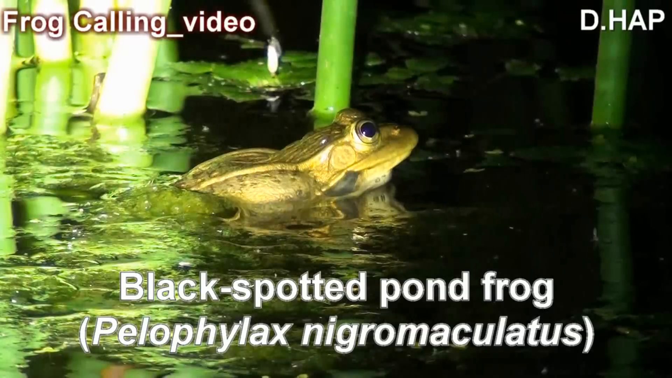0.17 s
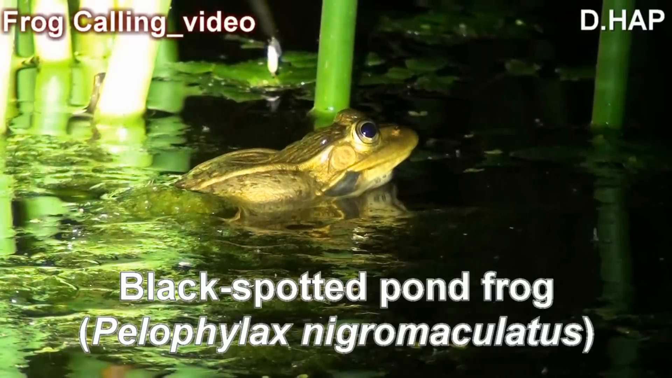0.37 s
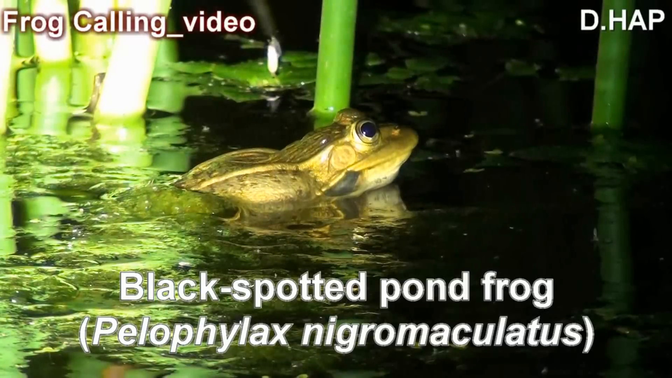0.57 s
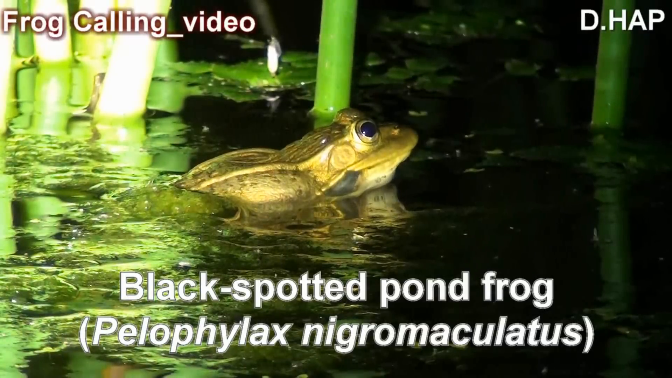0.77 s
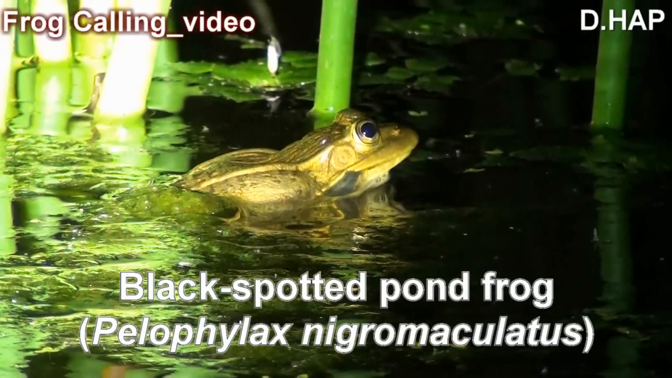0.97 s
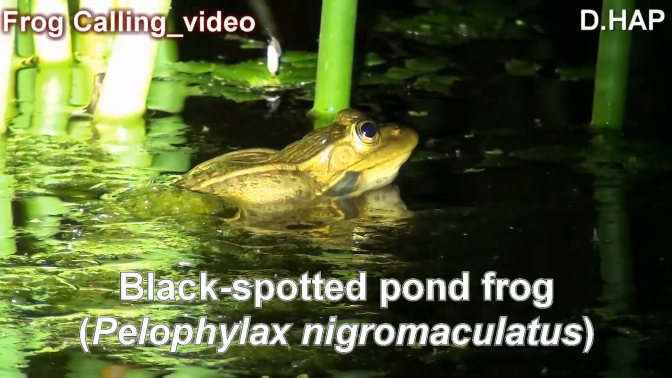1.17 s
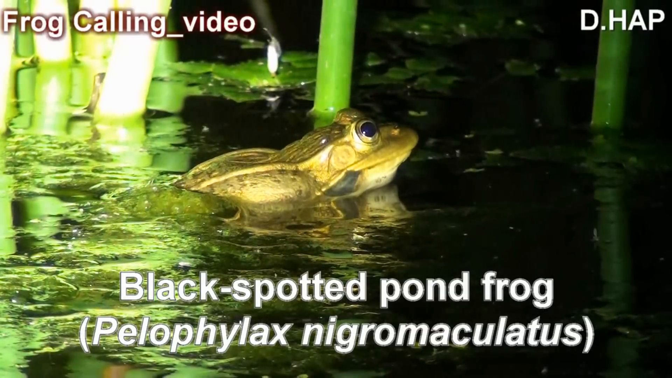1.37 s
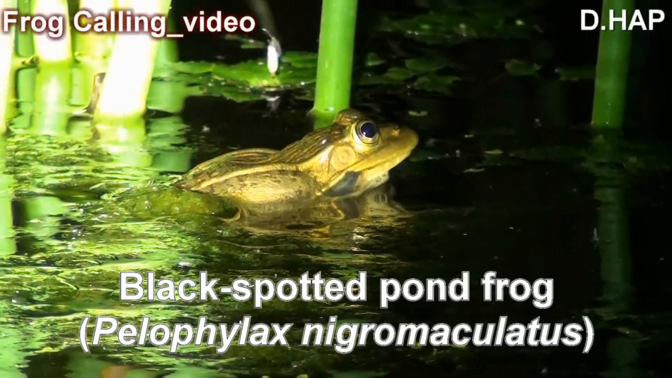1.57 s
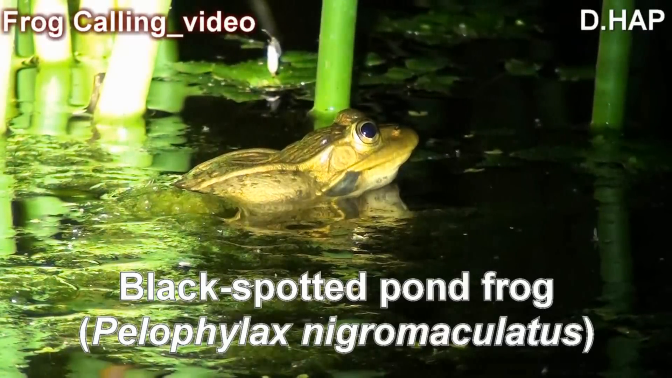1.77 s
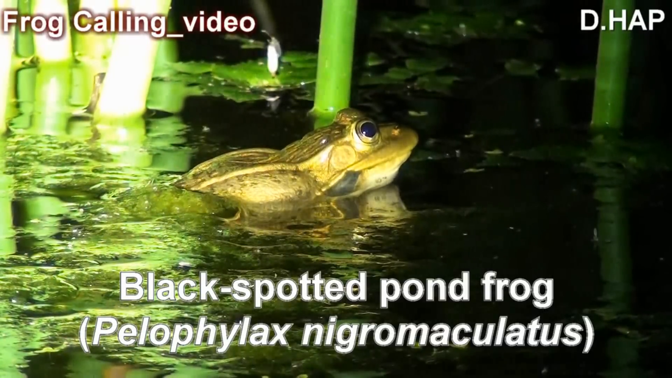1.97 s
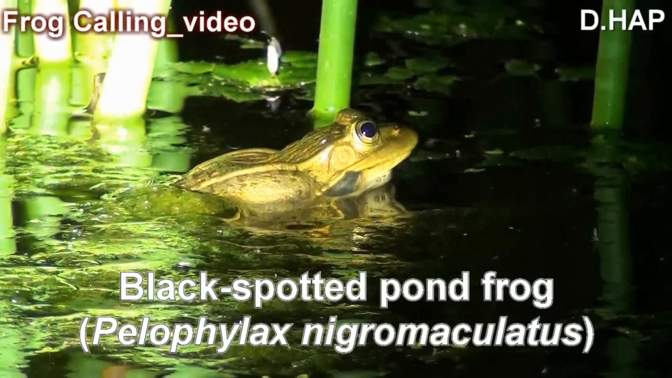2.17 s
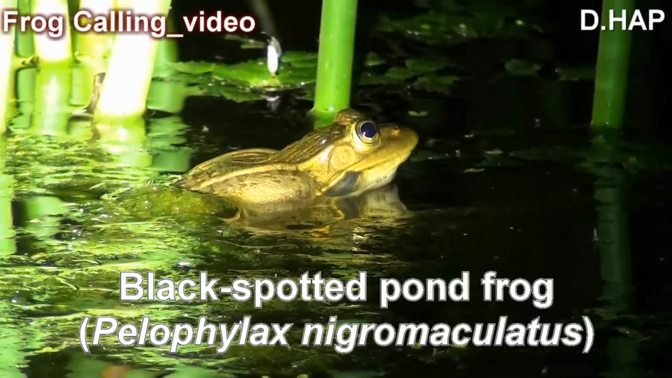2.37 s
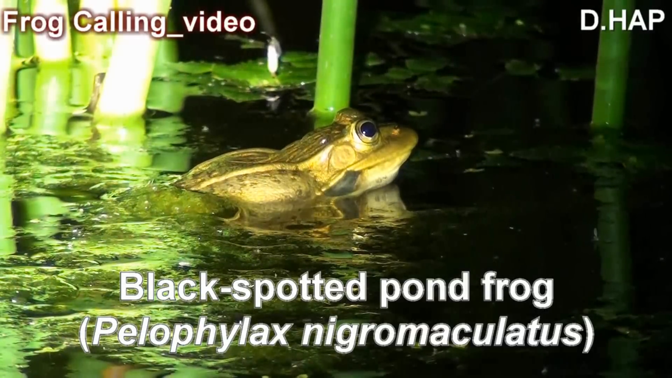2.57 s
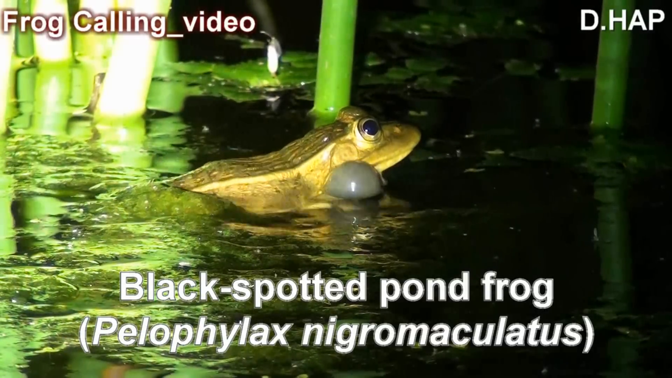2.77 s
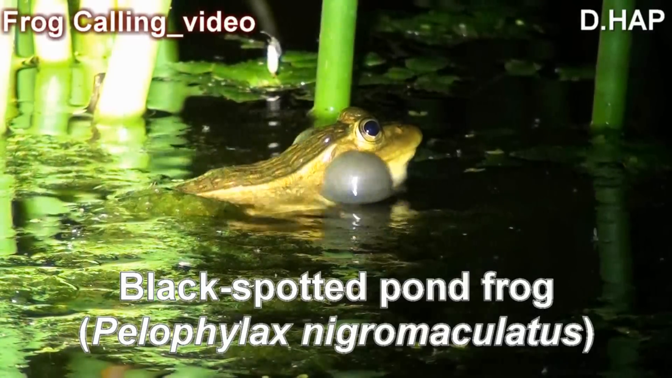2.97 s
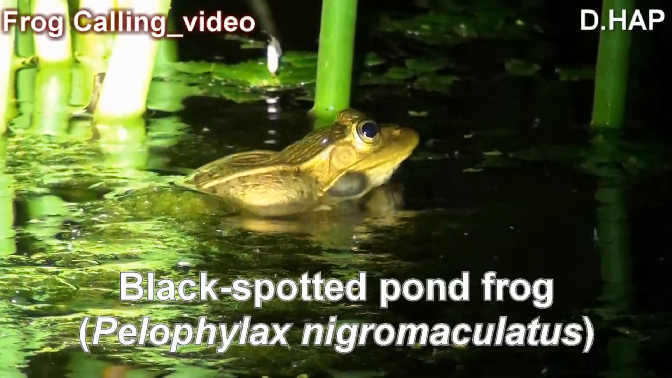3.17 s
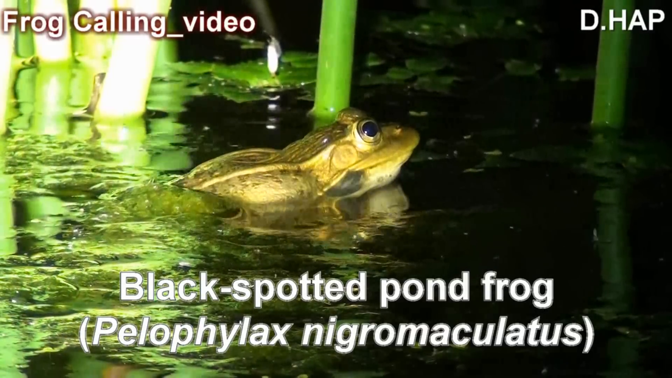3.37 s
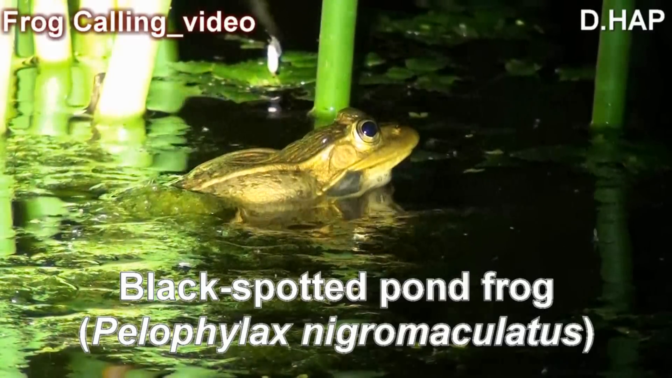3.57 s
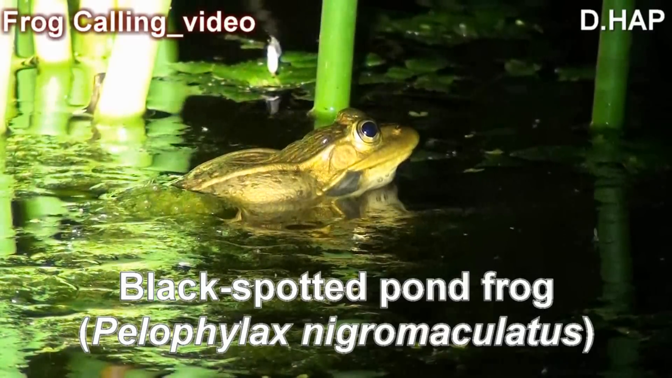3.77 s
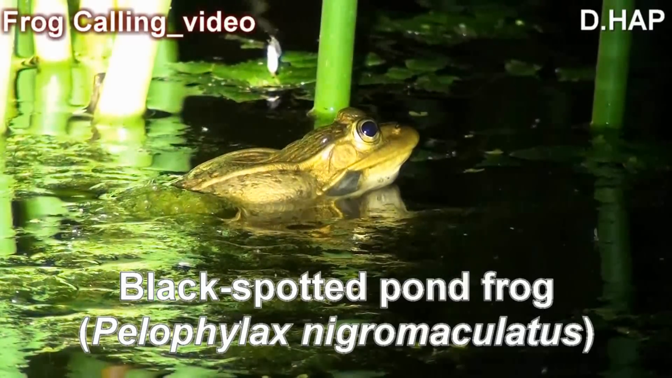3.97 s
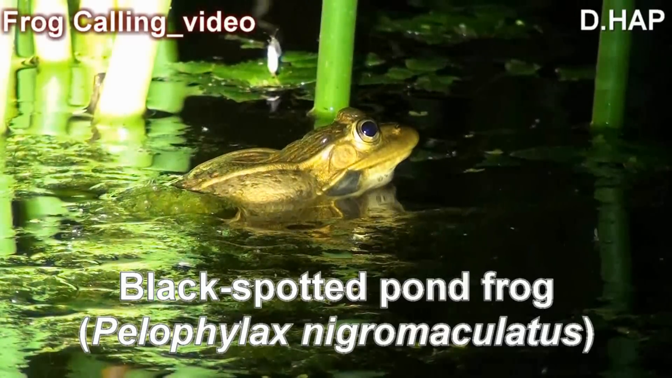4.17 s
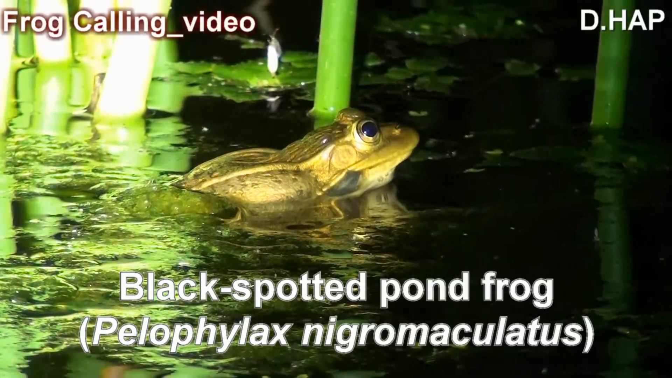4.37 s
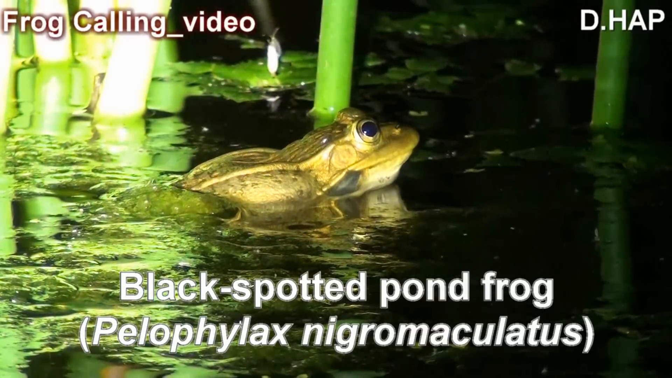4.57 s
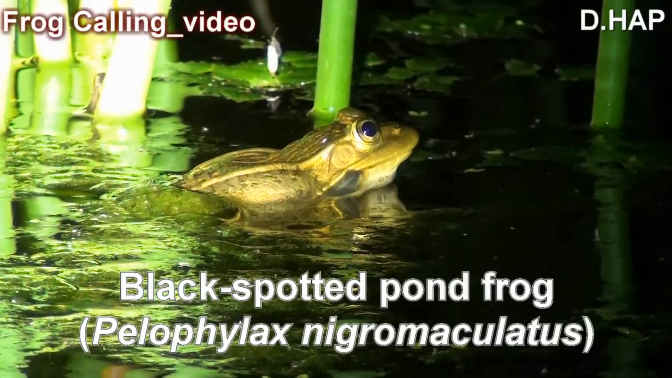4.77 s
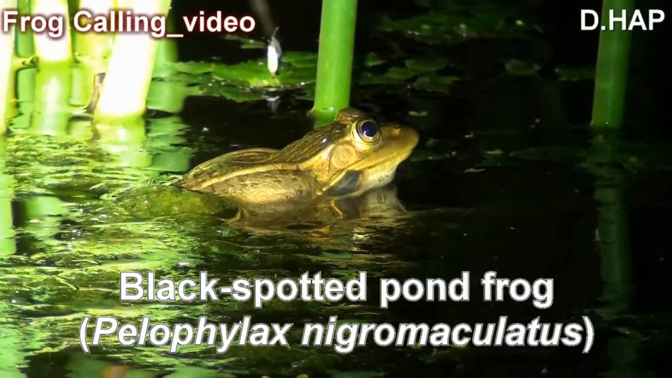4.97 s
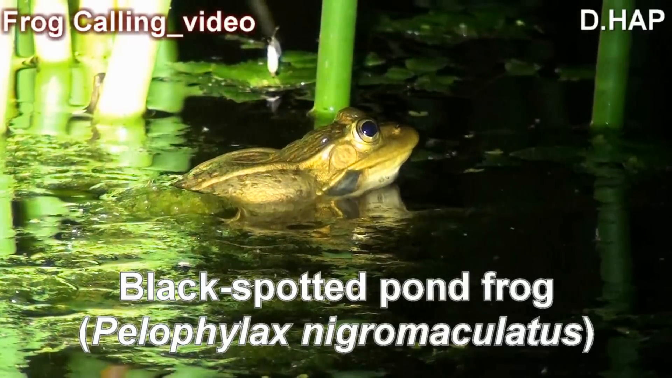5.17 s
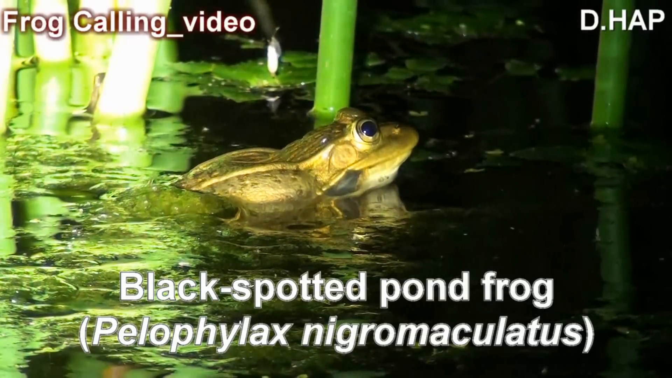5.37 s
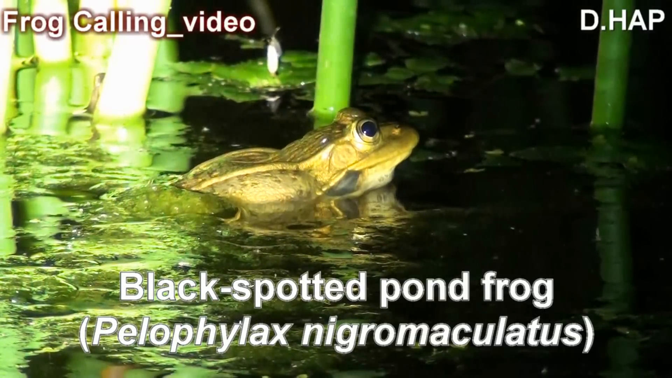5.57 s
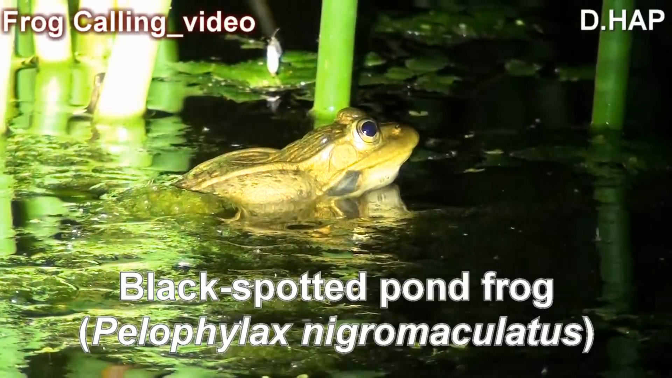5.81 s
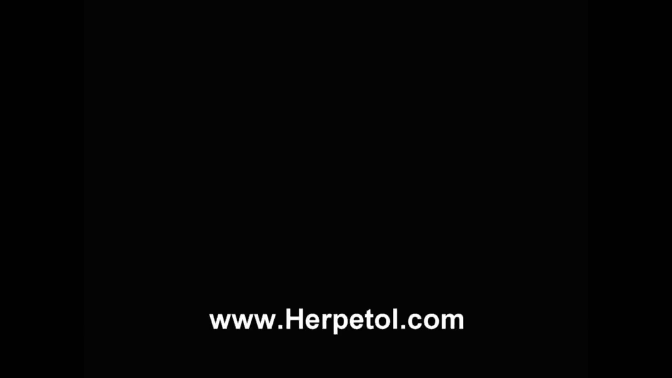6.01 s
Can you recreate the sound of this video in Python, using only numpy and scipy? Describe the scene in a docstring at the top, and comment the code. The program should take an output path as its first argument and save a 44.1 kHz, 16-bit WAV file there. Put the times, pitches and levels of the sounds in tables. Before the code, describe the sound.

Crickets buzz and pulse by a pond at night while one frog trills softly and a closer frog later gives a loud, rattling croak.

```python
"""Night at a pond. From the outset bush crickets buzz and pulse by scraping their wings, over a low rumble
and a distant frog chorus. A tree frog's note ends, and at once a neighbouring frog trills softly.
Near 2.8 s a close frog gives a rattling trill of six notes; in both trills each note is a run of
slowing snaps of the larynx that ring the vocal sacs. Later come two tiny ticks on the water,
and a few held notes rise from the far chorus."""
import sys
import numpy as np
from scipy import signal
from scipy.fft import rfft, irfft, next_fast_len
from scipy.io import wavfile
from scipy.ndimage import uniform_filter1d

SR = 44100
rng = np.random.default_rng(int(sys.argv[2]) if len(sys.argv) > 2 else 0)


def master_out(mix):
    """Clip the mix to full scale and print it as 16-bit PCM to the path in sys.argv[1]."""
    frames = np.transpose(np.atleast_2d(mix))
    ceiling = np.clip(frames, -1, 1)
    pcm = np.round(ceiling * 32767).astype(np.int16)
    wavfile.write(sys.argv[1], SR, pcm)


N = 266452
TIME = np.arange(N) / SR

# Spectra of the noisy sources. Each row: frequency in Hz, relative spectral density in dB.
RUMBLE_SPECTRUM = [(20, -22), (40, -12.5), (55, -5.5), (140, 1), (220, -4), (350, -11), (600, -11),
                   (1050, -8), (1500, -13), (2200, -19.5), (3200, -27.5), (4200, -30), (4850, -25.5),
                   (5600, -29), (11000, -52), (16000, -51)]
FAR_FROG_SPECTRUM = [(600, -21), (850, -10), (980, 4), (1080, 0), (1300, -13), (1800, -21.5)]
INSECT_CHORUS_SPECTRUM = [(5500, -24), (6050, -9), (6400, -1), (6850, 1), (7300, -4.5), (7800, -7),
                          (8500, -3), (9100, 2.5), (9450, -0.5), (10000, -3), (10700, -6.5), (11600, -12),
                          (14000, -17.5)]
BUZZ_SPECTRUM = [(5800, -35), (6500, -11), (6950, -0.5), (7200, -2), (7370, 2), (7520, 0.5), (7630, -3),
                 (7780, -2.5), (8300, -28)]
PULSE_SPECTRUM = [(7800, -23), (8800, 0), (9350, 6.5), (9700, 2.5), (10050, 3.5), (10300, -1), (10620, 1.5),
                  (11200, -10.5), (11700, -16.5), (12300, -9), (12900, -24), (13600, -15), (15800, -26)]
# Stereo widths. Each row: frequency in Hz, level of the side signal relative to the mid in dB.
FAR_WIDTH = [(60, -83), (200, -21.5), (700, -11), (1400, -11.5), (3000, -4.5), (8000, -20), (11500, -42)]
INSECT_WIDTH = [(3000, -8), (7000, -8.5), (9500, -14), (10800, -21), (11800, -42)]
# Held notes of far frogs. Each row: middle in seconds, length in seconds, pitch in Hz, level in dB.
FAR_CALLS = [(4.7, 0.32, 1060, -51.5), (5.15, 0.52, 973, -57), (5.75, .25, 950, -58)]
# Bouts of two bush crickets. Each row: start in seconds, end in seconds, level in dB.
WHINE_BOUTS = [(-1, 1.48, -55), (1.5, 2.9, -55), (3.5, 6.3, -56.5)]
BUZZ_BOUTS = [(-.2, 0.66, -48.5), (1.94, 2.9, -48.5), (4.35, 5.29, -48)]
# Pulse runs of the tree frog. Each row: start in seconds, number of pulses, level in dB.
TREE_FROG_RUNS = [(.1252, 4, -20), (.177, 12, -37)]
# Its resonances. Each row: frequency in Hz, gain in dB, time to decay by 60 dB in seconds.
TREE_FROG_MODES = [(1240, -12.5, 0.013), (1570, -8, .012), (3156, -5.5, 0.024), (3370, -10, 0.04),
                   (3980, -12, 0.0081)]
# Notes of the trills. Each row: start in seconds, number of snaps, last gap in seconds,
# change of level by the last snap in dB, level in dB.
NEIGHBOUR_NOTES = [(.1855, 5, .0055, 2, -31.5), (.2385, 8, .0044, -1, -23.5), (.2985, 7, .0034, 1, -19),
                   (.356, 7, .0032, -3, -21.5)]
CLOSE_NOTES = [(2.7912, 5, 0.009, 4.5, -28.5), (2.8423, 6, 0.0085, 3, -17), (2.8995, 6, .0137, -3, -13),
               (2.9570, 5, .0096, -0.5, -9.5), (3.0135, 6, .0133, -1.5, -9), (3.0708, 7, 0.011, -7.5, -6.5)]
# Resonances of vocal sac and throat. Each row: frequency before tuning in Hz, gain in dB,
# time to decay by 60 dB in seconds, first swing (1 outward, -1 inward).
NEIGHBOUR_MODES = [(480, -12.5, 0.02, 1), (575, -11.5, 0.017, -1), (880, -10.5, .012, -1),
                   (1390, -12.5, 0.012, -1), (1890, 1, 0.011, 1), (1870, -1.5, 0.0047, -1),
                   (2200, -11.5, 0.0085, 1), (4840, -11.5, 0.0051, 1)]
CLOSE_MODES = [(430, -11, 0.035, 1), (550, -11.5, 0.015, -1), (780, -10, 0.012, -1), (1000, -14, 0.014, 1),
               (1416, 1, 0.0054, 1), (1600, 1, 0.011, -1), (1764, -4.5, 0.012, 1), (2170, -11, 0.0085, -1),
               (2650, -24.5, 0.011, 1), (3000, -22.5, 0.0058, 1)]
# Water ticks. Each row: start in seconds, frequency in Hz, level in dB, time to decay by 60 dB in seconds.
WATER_TICKS = [(4.027, 7600, -27.5, 0.0024), (5.344, 4480, -44, 0.02)]


def from_db(db):
    """Amplitude grows tenfold for every 20 dB."""
    return 10 ** (np.asarray(db) / 20)


def rms_one(x):
    """Division by the root mean square gives unit power."""
    return x / np.sqrt(np.mean(x ** 2) + 1e-20)


def butterworth(x, order, hz, kind="low"):
    """A maximally flat filter falls by 6 dB an octave per order beyond its cutoff."""
    return signal.sosfilt(signal.butter(order, hz, kind, fs=SR, output="sos"), x)


def colour(x, spectrum):
    """Filtering multiplies the spectrum by a curve, here drawn through (Hz, dB) points."""
    hz, db = np.transpose(spectrum)
    size = next_fast_len(N)
    bin_hz = np.maximum(np.arange(size // 2 + 1) * SR / size, 1)
    gain = from_db(np.interp(np.log(bin_hz), np.log(hz), db))
    return irfft(rfft(x, size) * gain, size)[..., :N]


def wide_noise(spectrum, width):
    """Coloured noise of unit power, widened by a side signal in antiphase at the two ears."""
    mid, side = colour(rng.standard_normal((2, N)), spectrum)
    return rms_one(mid + colour(side, width) * [[1], [-1]])


def ring(drive, hz, t60):
    """A damped resonator answers a unit impulse with a decaying sine of height 1."""
    decay, angle = np.exp(-np.log(1000) / (t60 * SR)), 2 * np.pi * hz / SR
    feedback = [1, -2 * decay * np.cos(angle), decay * decay]
    return signal.lfilter([0, decay * np.sin(angle)], feedback, drive + 1e-18)


def narrow_noise(hz, t60):
    """A randomly driven resonator gives a narrow band of noise, scaled to unit power."""
    return rms_one(np.diff(ring(rng.standard_normal(N + 1), hz, t60)))


def click_train(times, db):
    """Impulses at the given moments excite all frequencies alike."""
    return np.bincount(np.round(np.asarray(times) * SR).astype(int), from_db(db), N)


def wander(samples):
    """A moving average of noise leaves a slow fluctuation, scaled to unit power."""
    return rms_one(uniform_filter1d(rng.standard_normal(N), size=samples))


def bouts(rows, attack_s, release_s):
    """A trapezoidal envelope lets each bout of song swell, hold and stop."""
    return sum(from_db(db) * np.clip((TIME - start) / attack_s, 0, 1)
               * np.clip((end - TIME) / release_s, 0, 1) for start, end, db in rows)


def rumble():
    """Broadband noise weighted to low frequencies is heard as a far rumble."""
    return from_db(-45) * wide_noise(RUMBLE_SPECTRUM, FAR_WIDTH)


def far_frogs(start_db=-64, rise_db_per_s=1.68):
    """Distant voices add incoherently into a gathering murmur, from which a few held notes rise."""
    out = from_db(start_db + rise_db_per_s * TIME) * wide_noise(FAR_FROG_SPECTRUM, FAR_WIDTH)
    for middle, length, hz, db in FAR_CALLS:
        swell = np.exp(-(2 * (TIME - middle) / length) ** 2)
        out += from_db(db) * swell * narrow_noise(hz, t60=.083)
    return out


def off_leaves(x, strength):
    """Interference with four short reflections from leaves combs the treble into fine peaks."""
    lags = (rng.uniform(.002, .012, 4) * SR).astype(int)
    reflections = sum(np.roll(x, lag, axis=-1) for lag in lags)
    return (x + strength * reflections) / np.sqrt(1 + len(lags) * strength ** 2)


def far_insects(syllables_per_s=30):
    """Distant stridulation: a bush cricket's narrow whine, a field cricket's trill, a blurred chorus."""
    whine = bouts(WHINE_BOUTS, attack_s=.51, release_s=.06) * narrow_noise(7160, t60=.015)
    syllables = np.clip(.3 + 2 * np.sin(2 * np.pi * syllables_per_s * TIME), 0, 1)
    hz = 3590 + 26 * wander(samples=500)
    tone = np.sin(2 * np.pi * np.cumsum(hz) / SR)
    field_cricket = from_db(-63.5 + 3.1 * wander(samples=700)) * syllables * tone
    chorus = off_leaves(wide_noise(INSECT_CHORUS_SPECTRUM, INSECT_WIDTH), strength=.13)
    return from_db(-50) * chorus + whine + field_cricket


def buzzing_cricket(wingbeat_hz=128.8, ring_hz=7535, waver_hz=28, warm_up_s=.38, warm_up_db=-12):
    """Stridulation: fast wings scrape on closing and on opening, and sustain one wing resonance."""
    soft_starts = [(start - warm_up_s, end, db + warm_up_db) for start, end, db in BUZZ_BOUTS]
    level = np.maximum(bouts(soft_starts, attack_s=warm_up_s, release_s=.02),
                       bouts(BUZZ_BOUTS, attack_s=.078, release_s=.02))
    phase = 2 * np.pi * wingbeat_hz * TIME
    strokes = rms_one(1 + .22 * np.cos(phase) + .18 * np.cos(2 * phase))
    hz = ring_hz + waver_hz * wander(samples=300)
    tone = rms_one(np.sin(2 * np.pi * np.cumsum(hz) / SR))
    scrape = wide_noise(BUZZ_SPECTRUM, INSECT_WIDTH)
    return from_db(-2.5) * level * strokes * (tone + scrape)


def pulsing_cricket(strokes_per_s=28.765, first_stroke_s=.031, sharpness=1.28, full_at_s=1.75, swell_s=.35):
    """Even wing strokes modulate the amplitude of a high rasp, a little softer at first."""
    holding_back = np.clip((full_at_s - TIME) / swell_s, 0, 1)
    db = -51 - 2 * holding_back + .5 * wander(samples=16000)
    strokes = np.exp(sharpness * np.cos(2 * np.pi * strokes_per_s * (TIME - first_stroke_s)))
    rasp = off_leaves(wide_noise(PULSE_SPECTRUM, INSECT_WIDTH), strength=.29)
    return from_db(db) * rms_one(strokes) * rasp * from_db([[-.3], [.3]])


def scatter(x, t60, delay_s):
    """Scattering from reeds and bank returns dense echoes that decay exponentially."""
    t = TIME[:SR // 2]
    envelope = np.exp(-np.log(1000) * t / t60) * np.clip(t / delay_s - 1, 0, 1)
    mid, side = rng.standard_normal((2, len(t))) * envelope
    side = butterworth(side, 1, 2500, "high")   # long waves reach both ears alike
    echoes = (mid + from_db(-7.5) * side * [[1], [-1]]) / np.sqrt(np.sum(mid ** 2))
    return signal.fftconvolve(x[None], echoes)[:, :N]


def tree_frog(gap_s=.0056, jitter_s=.0003, fade_db=-12.5):
    """Two runs of pulses, each dying ever faster, excite bright resonances; the bank reverberates."""
    clicks = np.zeros(N)
    for start, count, db in TREE_FROG_RUNS:
        pulse = np.arange(count)
        times = start + gap_s * pulse + rng.normal(0, jitter_s, count)
        clicks += click_train(times, db + fade_db * (pulse / pulse[-1]) ** 2)
    voice = sum((-1) ** k * from_db(db) * ring(clicks, hz, t60)
                for k, (hz, db, t60) in enumerate(TREE_FROG_MODES))
    voice = butterworth(voice, 4, 4400)
    reflected = colour(voice, [(2400, -18), (3000, 4), (3500, .5), (4200, 0)])
    return voice + from_db(-8) * scatter(reflected, t60=.6, delay_s=.0028)


def trill(notes, modes, first_gap_s, tuning, slack_per_db, hollow_per_db, low_edge_db, lead_db, top_hz):
    """Impulse excitation: the larynx rings the sacs with snaps that slow as the push of air runs out."""
    out, loudest = np.zeros(N), max(note[-1] for note in notes)
    for start, count, last_gap_s, change_db, db in notes:
        # Softer notes leave the sacs slacker: the upper modes drop and the sound is hollower.
        softer_db = loudest - db
        pitch_factor = tuning - slack_per_db * softer_db
        hollow_db = 2.5 + hollow_per_db * softer_db
        snap_rates = np.linspace(1 / first_gap_s, 1 / last_gap_s, count - 1)
        since = np.append(0, np.cumsum(1 / snap_rates))
        progress = since / since[-1]
        force_db = db + change_db * progress ** 2
        force_db[:2] += [-3, 2.7]   # a weak first snap, an accented second
        # A faint tick comes just before the larynx opens.
        times = start + np.append(-.003, since)
        force_db = np.append(db + lead_db, force_db)
        progress = np.append(0, progress)
        # The low modes are strongest in mid-note, when the sacs are tightest.
        low_db = hollow_db + low_edge_db * (2 * progress ** .74 - 1) ** 2
        at = int(times[0] * SR) - 1
        span = slice(at, at + SR // 8)
        for hz, mode_db, t60, swing in modes:
            is_low = hz < 700
            spread_db = rng.normal(0, 1.3, len(times))   # each snap shares its energy differently
            snaps = click_train(times, force_db + mode_db + is_low * low_db + spread_db)
            out[span] += swing * ring(snaps[span], hz if is_low else hz * pitch_factor, t60)
    out = butterworth(out, 6, 340, "high")   # a small body radiates no bass
    return butterworth(out, 4, top_hz)   # soft snaps hold little treble


def neighbour_frog():
    """A smaller voice a little farther off, so reflected sound is stronger relative to direct."""
    voice = trill(NEIGHBOUR_NOTES, NEIGHBOUR_MODES, first_gap_s=.00222, tuning=.98, slack_per_db=.004,
                  hollow_per_db=.46, low_edge_db=-2.5, lead_db=-20, top_hz=3140)
    return voice * from_db([[.3], [-.3]]) + from_db(-8.5) * scatter(voice, t60=.093, delay_s=.0014)


def close_frog():
    """Near the source direct sound dominates: a trill and its overtone, with faint echoes."""
    voice = trill(CLOSE_NOTES, CLOSE_MODES, first_gap_s=.003, tuning=1.052, slack_per_db=.011,
                  hollow_per_db=.42, low_edge_db=-13.5, lead_db=-21, top_hz=3540) + overtone()
    return voice * from_db([[.3], [-.3]]) + from_db(-11.5) * scatter(voice, t60=.093, delay_s=.0026)


def overtone(top_hz=4610, sink_hz_per_s=2700, sag_hz_per_s=6400, lead_s=.005, length_s=.049):
    """A thin falling tone in each close note but the first, made raspy by random amplitude modulation."""
    out, loudest = np.zeros(N), max(note[-1] for note in CLOSE_NOTES)
    t = TIME[:int(length_s * SR)]
    swell = np.sin(np.pi * (t / length_s) ** .66) ** .7
    for start, *_, db in CLOSE_NOTES[1:]:
        onset_hz = top_hz - sink_hz_per_s * (start - CLOSE_NOTES[0][0])   # lower as the sacs fill
        tone = np.sin(2 * np.pi * np.cumsum(onset_hz - sag_hz_per_s * t) / SR)
        at = int((start - lead_s) * SR)
        out[at:at + len(t)] += from_db(-40.5 + .79 * (db - loudest)) * swell * tone
    return out * wander(samples=130)


def water_ticks():
    """Each tiny pop on the water is one quickly damped oscillation."""
    return sum(ring(click_train([start], [db]), hz, t60) for start, hz, db, t60 in WATER_TICKS)


def scene():
    """Superposition: the pressures of the surrounding night and of the nearer sources add."""
    night = rumble() + far_frogs() + far_insects() + buzzing_cricket() + pulsing_cricket()
    return night + tree_frog() + neighbour_frog() + close_frog() + water_ticks()


def record(dry, start_s=.1225, cutoff_hz=15800):
    """A gate opens after a moment of silence, and a steep low-pass filter limits the bandwidth."""
    gate = np.clip((TIME - start_s) / .002, 0, 1)
    return signal.sosfilt(signal.ellip(12, .1, 80, cutoff_hz, fs=SR, output="sos"), dry * gate)


dry = scene()
out = record(dry)
master_out(out)
```